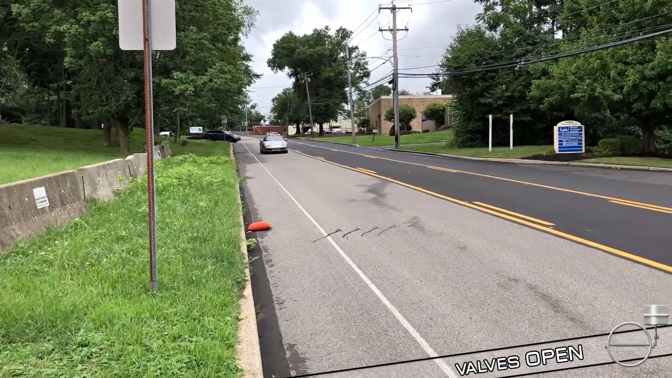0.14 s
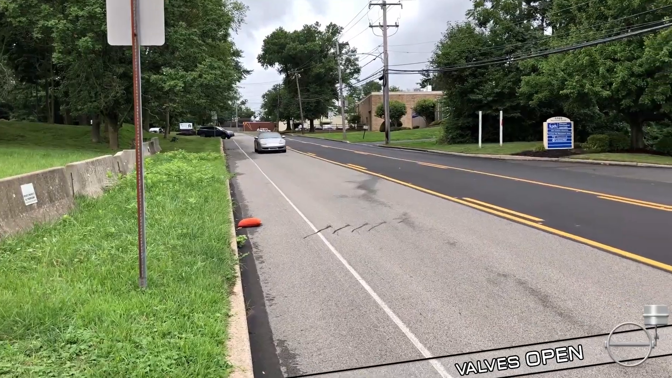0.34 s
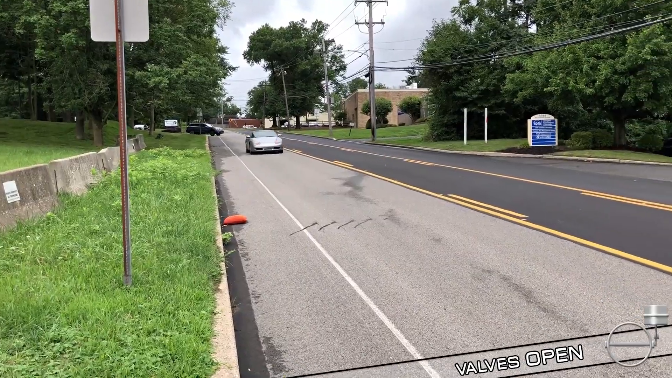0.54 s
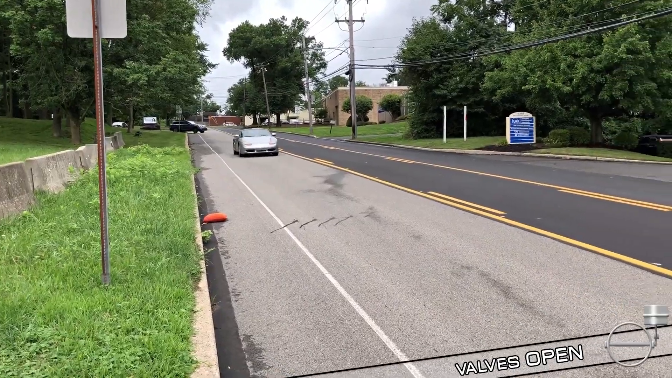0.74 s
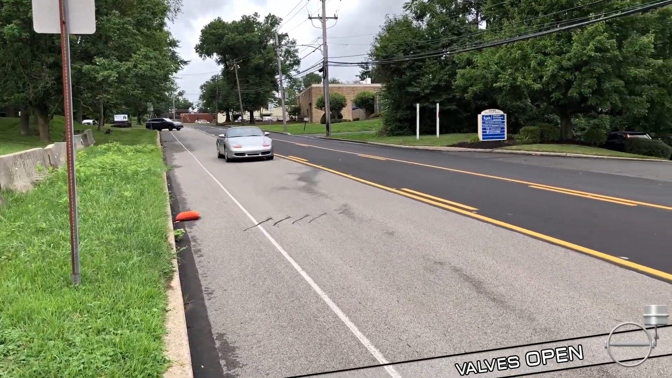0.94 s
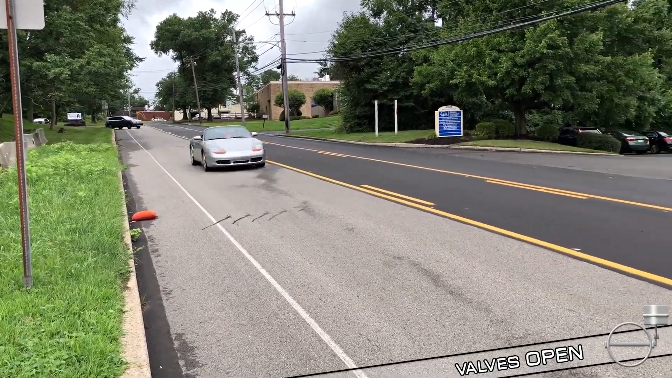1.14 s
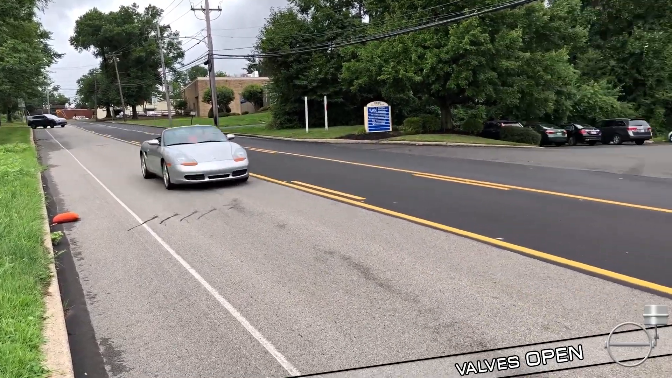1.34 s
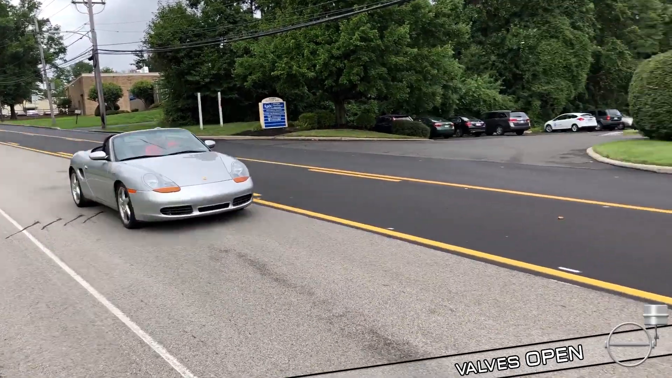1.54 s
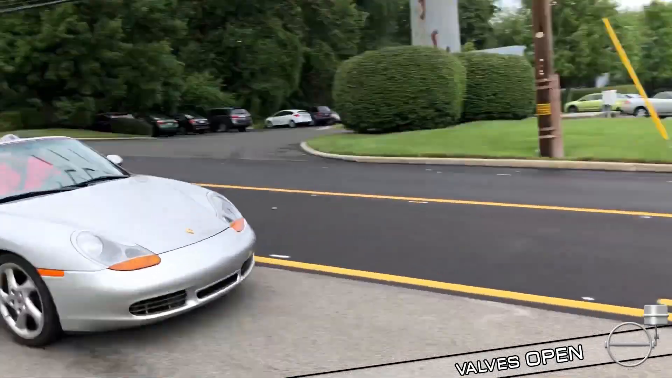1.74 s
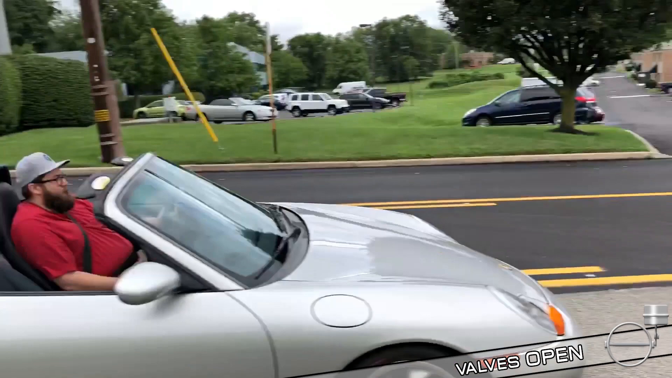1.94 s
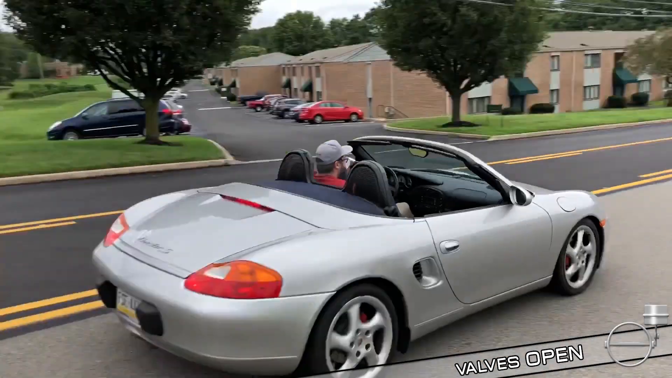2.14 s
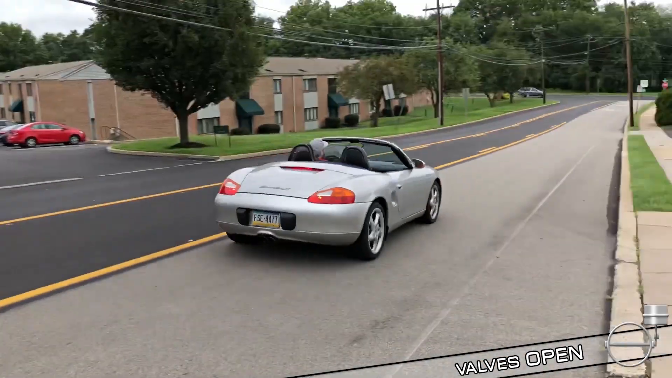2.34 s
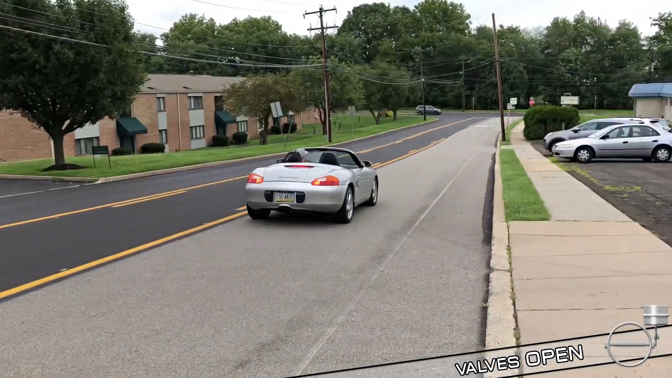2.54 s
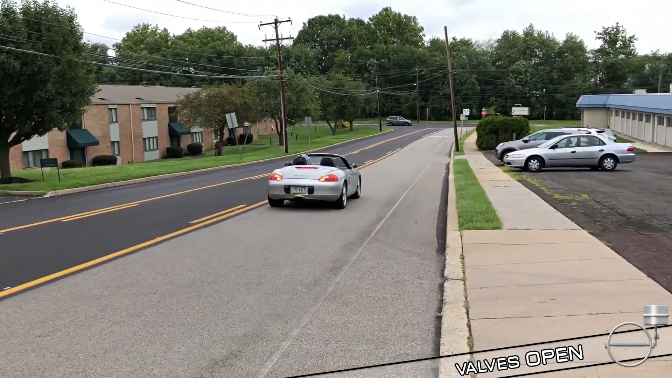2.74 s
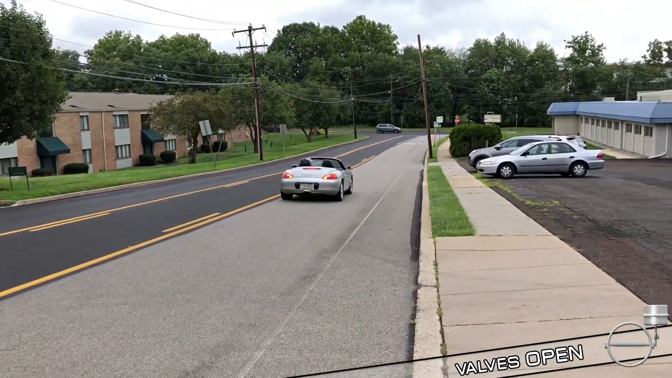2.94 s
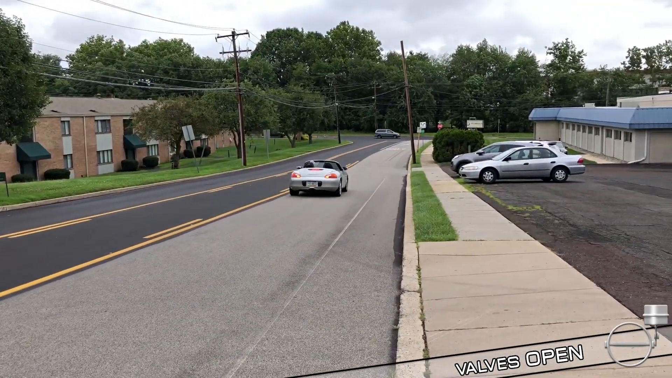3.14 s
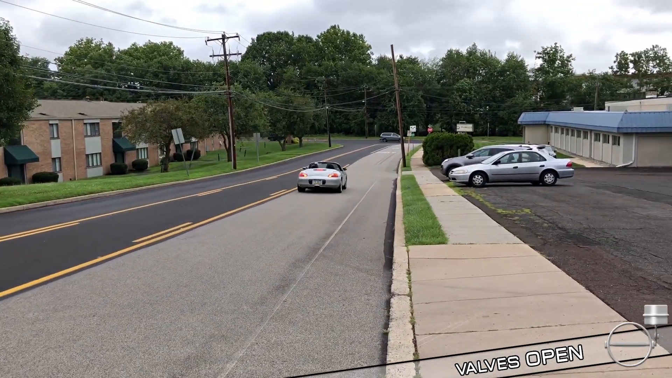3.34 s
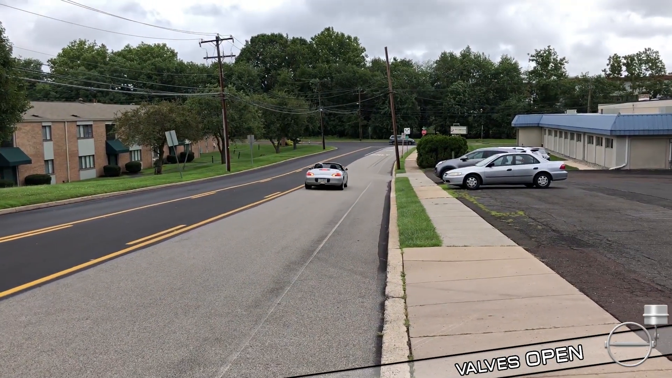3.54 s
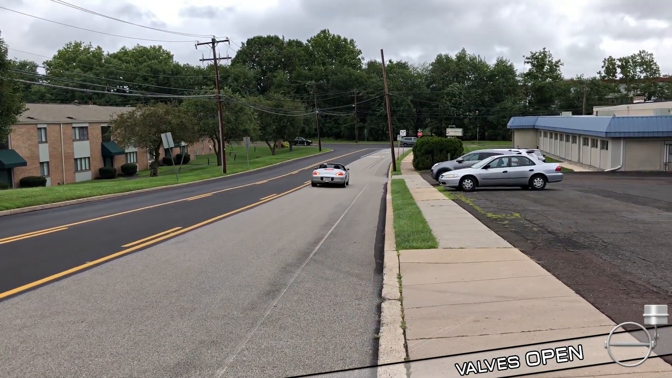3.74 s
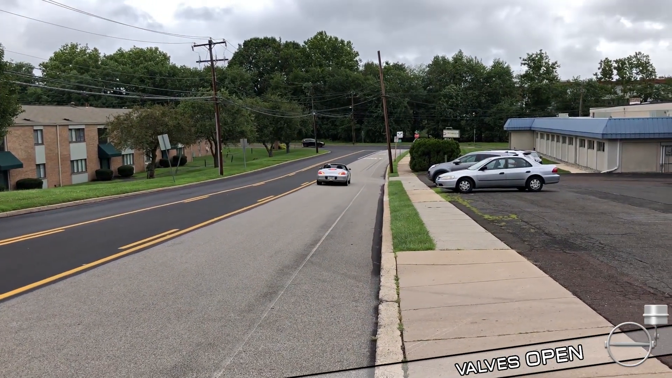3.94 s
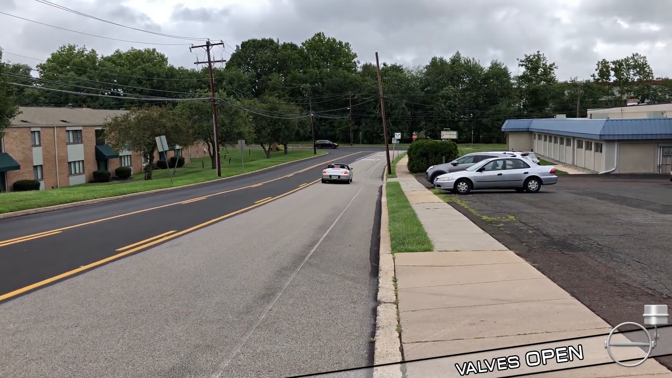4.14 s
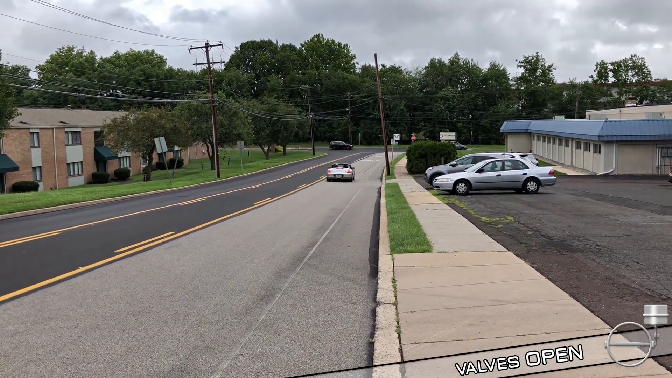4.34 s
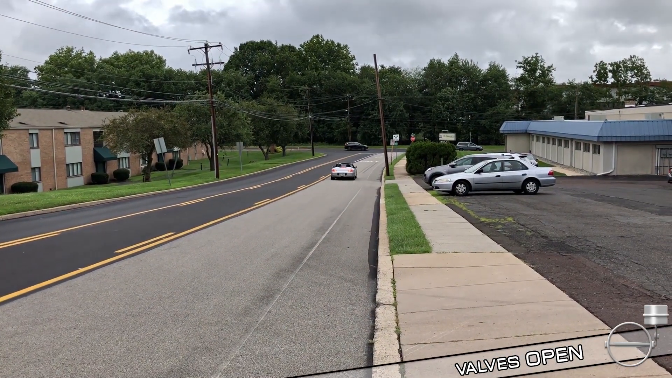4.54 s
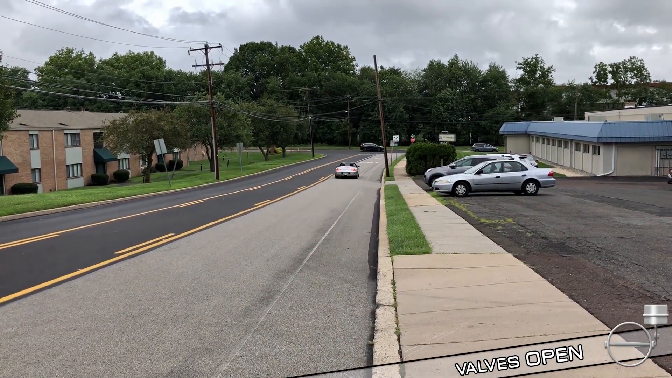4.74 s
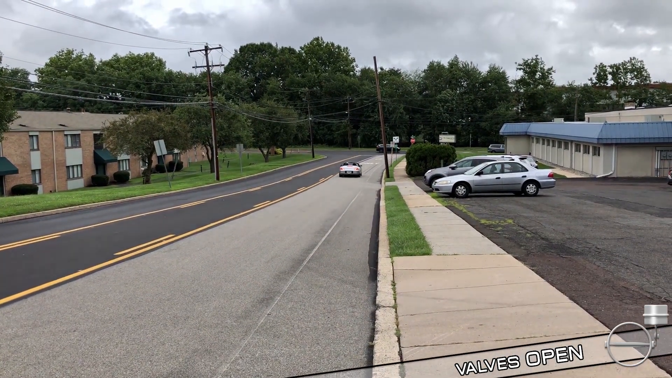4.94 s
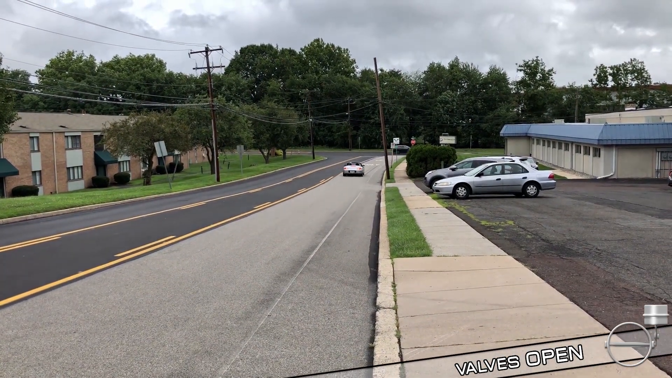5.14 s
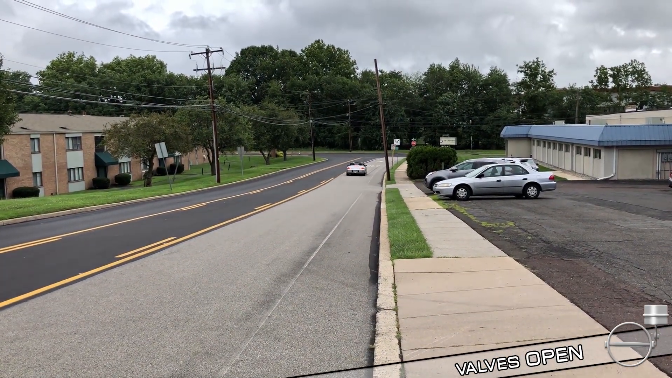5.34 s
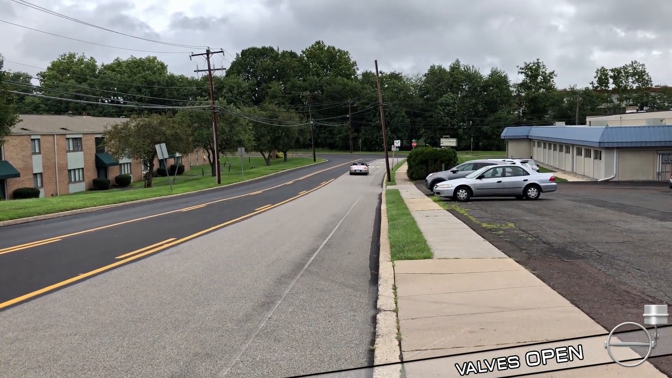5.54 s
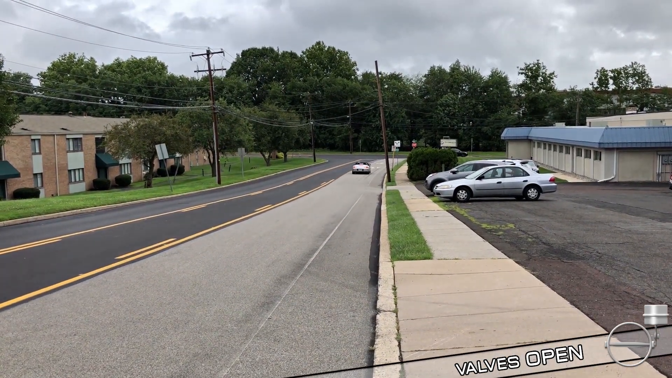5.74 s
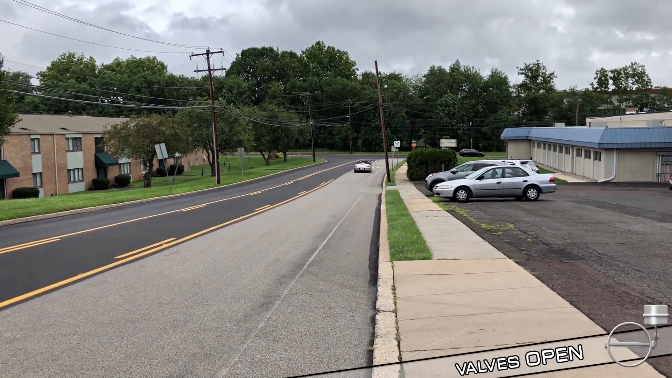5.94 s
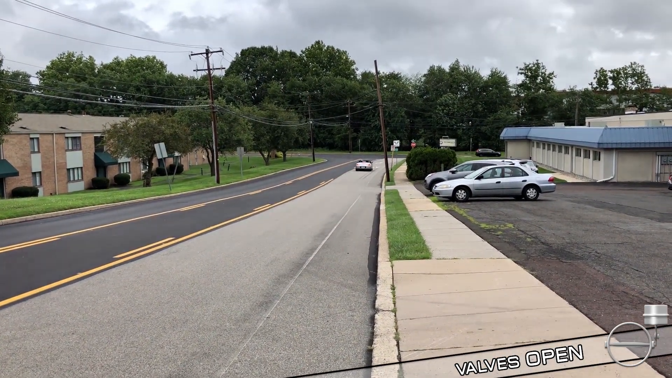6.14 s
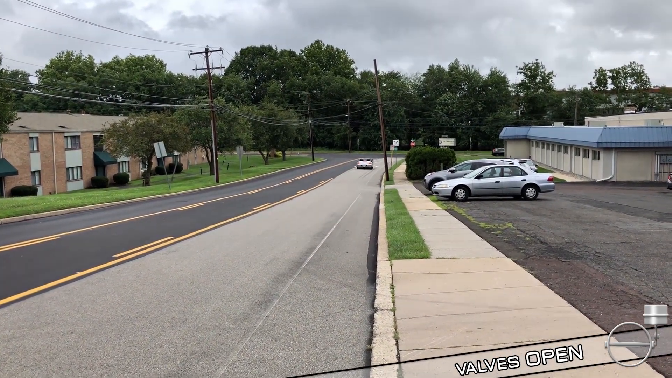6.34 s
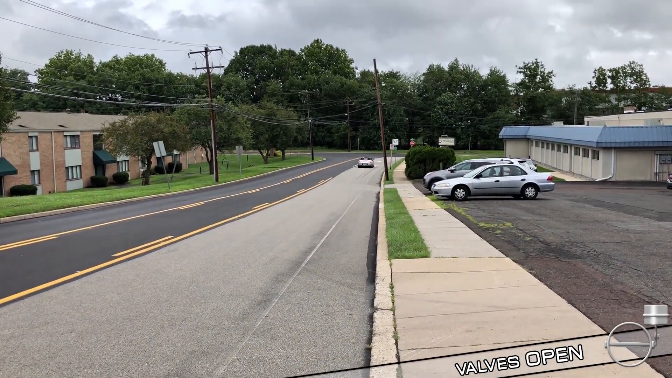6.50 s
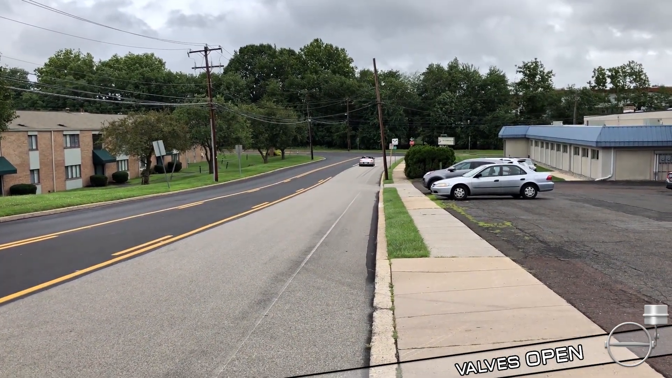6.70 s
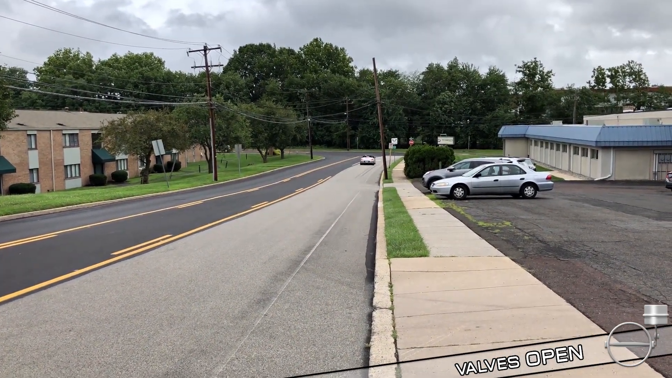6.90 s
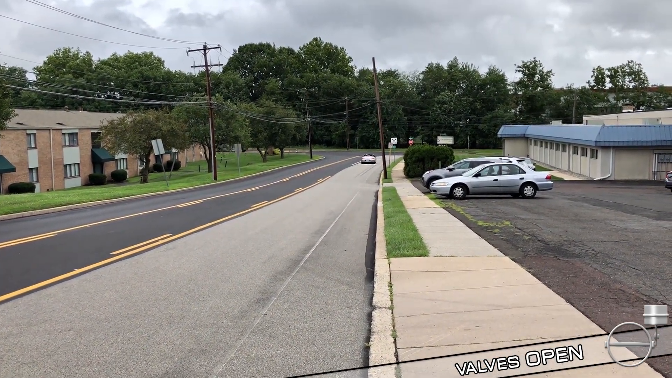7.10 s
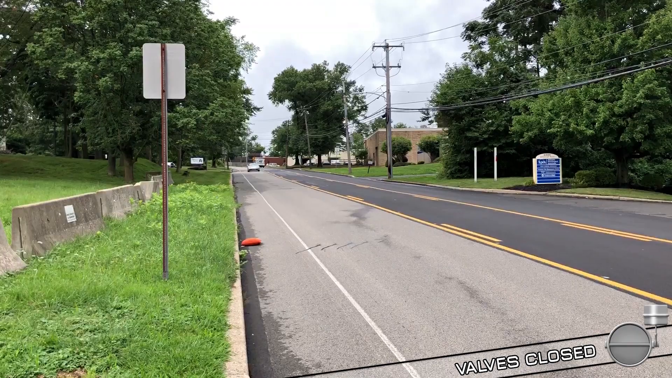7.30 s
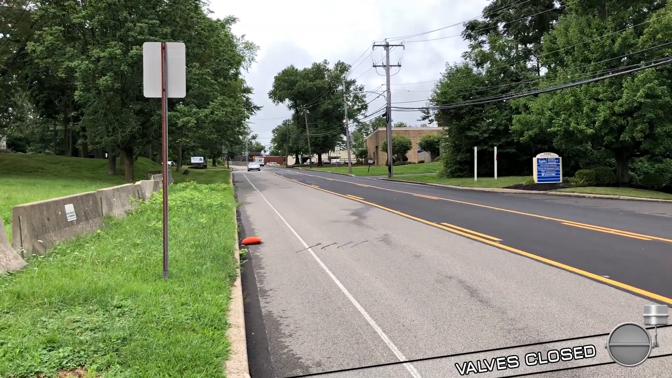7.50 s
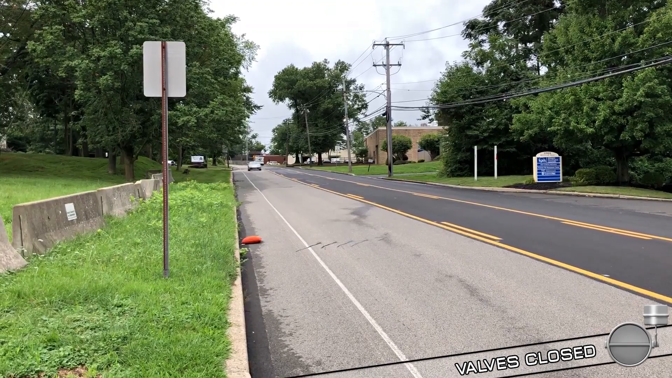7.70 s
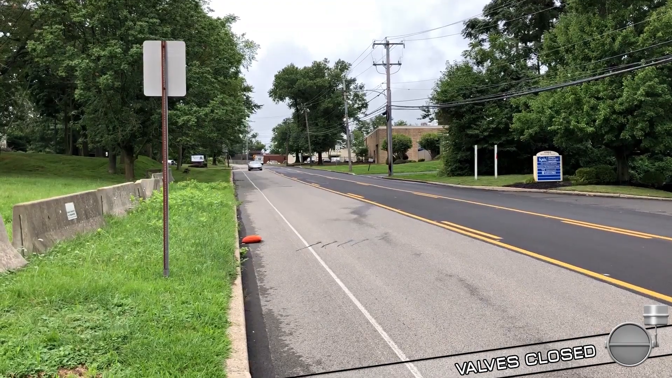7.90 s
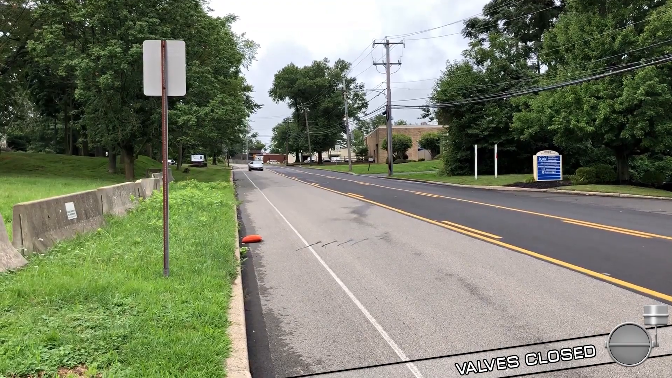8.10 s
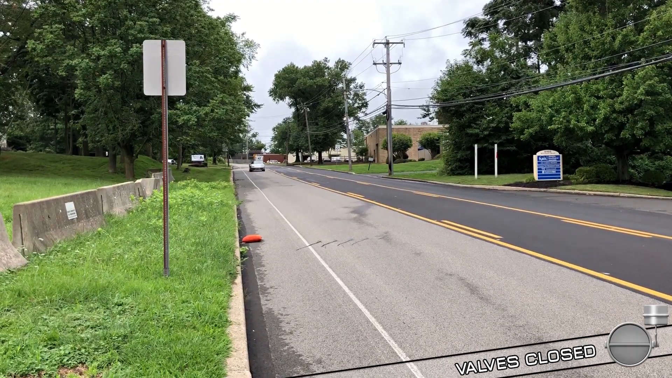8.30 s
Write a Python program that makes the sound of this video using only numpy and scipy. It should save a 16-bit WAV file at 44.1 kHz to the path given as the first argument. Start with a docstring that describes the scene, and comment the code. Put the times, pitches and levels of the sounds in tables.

```python
"""A sports car passing

A flat-six car comes up a tree-lined road, passes close by and pulls away, with one hard stab of throttle. Its
firings make exhaust harmonics and rasp; its tyre noise changes colour with the angle of view. Wind bumps the
microphone and the brakes sing thinly on the approach. Then the car approaches again from far off, quietly, with
one sharp exhaust crack, while two insects chirp in the verge."""
import sys
import numpy as np
from scipy import signal
from scipy.fft import rfft, irfft, next_fast_len
from scipy.io import wavfile
from scipy.ndimage import uniform_filter1d, map_coordinates

SR = 44100
rng = np.random.default_rng(int(sys.argv[2]) if len(sys.argv) > 2 else 0)


def transcribe(signal):
    """Save signal, clipped to [-1, 1], as a 16-bit WAV file at the path in sys.argv[1]."""
    frames = np.atleast_2d(signal).T
    limited = np.clip(frames, -1, 1)
    pcm = np.round(limited * 32767).astype(np.int16)
    wavfile.write(sys.argv[1], SR, pcm)


N = 373086
TIME = np.arange(N) / SR

# firing rate of one cylinder bank, Doppler shift included: t/s, f/Hz
BANK_RATE = [(0, 109.5), (1.1, 108.1), (1.7, 99), (1.88, 93.14), (2.06, 96.5), (2.3, 76), (2.42, 73.94),
             (2.9, 103.6), (3.15, 100.4), (4.5, 94.08), (5.0, 90.4), (5.18, 86.8), (5.36, 100.1),
             (5.5, 101.1), (5.65, 88.6), (5.9, 79.5), (6.3, 90.05), (6.88, 113.1), (7.1, 106.8), (7.6, 100),
             (8.0, 98.9), (8.46, 109.8)]
# presses of the throttle: start t/s, rise t/s, end t/s, depth (0-1)
THROTTLE_PRESSES = [(0.05, 0.32, 0.83, .615), (2.56, 0.23, 4.95, .605), (5.08, .24, 5.405, 1),
                    (5.41, 0.0384, 5.55, 0.68), (6.2, .3, 7.37, .62)]
# boom at the firing rate of one bank: t/s, level/dB
BOOM_LEVEL = [(0.35, -47.5), (0.94, -39.5), (1.02, -48), (1.09, -30), (1.43, -26.5), (1.52, -38),
              (1.75, -19.5), (1.91, -19.5), (1.95, -31), (2.09, -9.5), (2.45, -27.5), (3.22, -30.5),
              (3.26, -46), (3.31, -34.5), (3.47, -24), (3.58, -41), (3.71, -44), (3.74, -32.5),
              (4.91, -37.5), (5.09, -43.5), (5.82, -41), (5.88, -47), (6.2, -36), (6.43, -44.5),
              (6.92, -32), (7.01, -40), (7.06, -31.5), (7.76, -58), (8.41, -47.5), (8.46, -54)]
# lines of the exhaust drone: multiple of the four-stroke cycle, relative level/dB
DRONE_ORDERS = [(2, -10), (7, -3.5), (8, -3.5), (9, -18), (10, -10), (12, 1), (13, -14), (16, 1), (17, -18),
                (30, -3.5), (33, -2.5), (39, -3.5)]
# response of the exhaust pipe: f/Hz, relative level/dB
PIPE_RESPONSE = [(60, -45), (200, -12), (300, -10), (400, -10), (590, -0.5), (720, -15), (900, -3),
                 (1200, 0.5), (1480, -14), (1750, -6.5), (2200, -2), (2750, -13.5), (3150, -13.5),
                 (4400, -27.5), (7500, -26), (15600, -50)]
# reverberation time of the street: f/Hz, t/s
STREET_T60 = [(100, 1), (1000, 0.22), (4000, 0.12), (12000, 0.047)]
# tyre spectra from five views: f/Hz, relative level/dB
TYRE_FRONT = [(180, -14.5), (300, -8), (326, -21), (348, -8.5), (526, -3), (708, -11), (836, -4),
              (970, -1.5), (1370, -7.5), (1760, -3), (3760, -24), (4500, -25), (5970, -26.5), (10500, -38),
              (12600, -37.5), (15600, -50)]
TYRE_SIDE = [(250, -6), (340, -3.5), (420, -11.5), (560, -1.5), (720, -1.5), (1000, -5), (1300, -3),
             (2000, -7.5), (3400, -17.5), (4600, -27), (6300, -26.5), (8400, -37), (13600, -34),
             (15600, -34)]
TYRE_REAR = [(300, -10), (600, -1), (900, 3.5), (1350, -6), (1650, -3.5), (2200, -10.5), (2550, -14.5),
             (3100, -17.5), (3700, -19.5), (5000, -18.5), (7200, -27), (9000, -27.5), (13000, -30.5),
             (15600, -38)]
TYRE_FAR_LEAVING = [(180, -36), (300, -27), (354, -8), (384, -7), (469, 1.5), (581, -1), (732, -7),
                    (923, -4), (1200, -11), (1280, -6), (2140, -6.5), (3580, -25), (5230, -29), (9020, -41),
                    (15600, -50)]  # mixed with engine rush
TYRE_FAR_COMING = [(300, -7.5), (750, -8), (900, -4), (1100, -2.5), (1380, -7.5), (1960, -4), (2620, -17.5),
                   (3570, -13), (4930, -21.5), (8000, -29.5), (11000, -34.5), (15600, -42)]
# view of the car: t/s, view (0-4, in the order above)
VIEW = [(1.6, 0), (1.95, 1), (2.25, 1), (2.75, 2), (4.9, 2), (6.4, 3), (7.25, 3), (7.45, 4)]
# tyre noise at the least distance, a row per view: body roar level/dB, tread level/dB, hiss level/dB
TYRE_LEVELS = [(-25, -20.6, -34), (-22, -20, -31), (-23, -20, -28), (-18.5, -24, -23), (-29, -30.5, -34.5)]
# notches in the rear view: f/Hz, width/Hz, relative level/dB
REAR_NOTCHES = [(787, 92, -10), (2700, 130, -4), (4300, 770, -2.5), (10555, 830, -7)]
# tailpipe resonances heard from behind: f/Hz, width/Hz, relative level/dB
PIPE_RESONANCES = [(1910, 45, 2), (2140, 69, 3), (4600, 85, 1), (5780, 55, -3)]
# spectra of the car's rumble and of wind on the microphone: f/Hz, relative level/dB
RUMBLE_SPECTRUM = [(20, -47), (45, -18), (62, 1.5), (80, 2.5), (110, 1), (170, -1.5), (270, -2.5),
                   (400, -20.5), (700, -65)]
BUFFET_SPECTRUM = [(8.8, -26), (15, 2), (91, 0.5), (171, -7.5), (209, 2.5), (277, -13.5), (311, -11),
                   (358, -33), (450, -22), (580, -54), (990, -120)]
# a gust, then the car's bow wave: start t/s, end t/s, level/dB
GUSTS = [(0, 0.222, -21.5), (2.064, 2.078, -33)]
# song of the brake pads: t/s, f/Hz, relative level/dB
BRAKE_SONG = [(1.1, 13800, -60), (1.116, 13700, -48), (1.232, 13400, -48), (1.384, 13700, -36.5),
              (1.784, 13600, -30), (1.88, 13380, -44)]
# chirps of two insects, a lower and a higher: t/s, relative level/dB, f/Hz
CHIRPS = [(7.1835, -60, 9160), (7.2908, -65, 9430), (7.4586, -63, 9480), (7.5056, -59, 9070),
          (7.652, -67, 9490), (7.7147, -59, 9100), (7.8314, -65.5, 9570), (7.914, -57, 9120),
          (8.0266, -64, 9500), (8.1607, -57.5, 9100), (8.239, -62.5, 9600), (8.3958, -59, 9200)]

SPEED_M_PER_S, LEAST_DISTANCE_M = 13.25, 3.165
PASS_AT, RETURN_AT = 2.03, 10.43  # t/s: the car draws level, and would again on its second approach
RETURN_FROM, RETURN_FADE_S, VALVES_DB = 7.25, 0.24, -4  # second approach, with the exhaust valves closed
ABEAM_AT, ABEAM_S = 1.985, 0.067  # flank and side intake face the microphone: t/s, half width/s
WAKE_AT, WAKE_S = 2.41, 0.54  # the turbulent wake lies in the sound path: t/s, half width/s


def amp(db):
    """Decibels to amplitude ratio."""
    return 10 ** (np.asarray(db) / 20)


def unit(x):
    """x at rms 1."""
    return x / np.sqrt(np.mean(x ** 2) + 1e-20)


def along(points, hz):
    """(f/Hz, value) points interpolated on a log frequency axis."""
    f, v = np.transpose(points)
    return np.interp(np.log(hz + 1), np.log(f + 1), v)


def curves(rows):
    """One value per sample for each column after the time."""
    times, *columns = np.transpose(rows)
    return [np.interp(TIME, times, column) for column in columns]


def bump(at, half_width):
    """A Gaussian of height 1 in time."""
    return np.exp(-((TIME - at) / half_width) ** 2)


def wobble(rate):
    """A smooth random curve, rate knots a second."""
    return map_coordinates(rng.standard_normal(int(N * rate / SR) + 4), [TIME * rate])


def harmonic(angle, order):
    """A sine of rms 1 locked to the four-stroke cycle."""
    return np.sqrt(2) * np.sin(order * angle)


def filtered(x, response):
    """Linear filtering: the spectrum of x times a frequency response."""
    size = next_fast_len(N + 8192)
    return irfft(rfft(x, size) * response(np.fft.rfftfreq(size, 1 / SR)), size)[:N]


def shaped(x, bells):
    """x with Gaussian peaks or notches (f/Hz, width/Hz, level/dB)."""
    return filtered(x, lambda hz: amp(sum(db * np.exp(-((hz - centre) / width) ** 2)
                                          for centre, width, db in bells)))


def coloured(x, spectrum):
    """x filtered by a (f/Hz, level/dB) curve, at rms 1."""
    return unit(filtered(x, lambda hz: amp(along(spectrum, hz))))


def noise(spectrum):
    """Coloured Gaussian noise of rms 1."""
    return coloured(rng.standard_normal(N), spectrum)


def street(x, wet_db):
    """Reverberation: trees and house fronts add a diffuse tail whose treble dies first."""
    hz, t, spectra = signal.stft(rng.standard_normal(SR // 2), SR, nperseg=256)
    decay = amp(-60 * t / along(STREET_T60, hz)[:, None])
    tail = signal.istft(spectra * decay, SR, nperseg=256)[1]
    return x + amp(wet_db) * signal.fftconvolve(x, tail / np.linalg.norm(tail))[:N]


def drive(lift_s=0.105, ease_per_s=0.125):
    """The car's state: straight-line motion sets spherical spreading and aspect; the pedal sets load."""
    again = np.clip((TIME - RETURN_FROM) / RETURN_FADE_S, 0, 1)
    blend = lambda pair: (1 - again) * pair[0] + again * pair[1]
    to_go = SPEED_M_PER_S * (np.array([[PASS_AT], [RETURN_AT]]) - TIME)
    distance = np.hypot(to_go, LEAST_DISTANCE_M)
    throttle = np.zeros(N)
    for start, rise, end, depth in THROTTLE_PRESSES:
        pressed = np.clip(np.minimum((TIME - start) / rise, 1 - (TIME - end) / lift_s), 0, 1)
        throttle = np.maximum(throttle, depth * np.exp(-ease_per_s * (TIME - start)) * pressed)
    return dict(spread_db=blend(20 * np.log10(LEAST_DISTANCE_M / distance)),
                ahead=blend((1 + to_go / distance) / 2),  # 1 nose on, 0 tail on
                again=again, throttle=throttle, bank_hz=curves(BANK_RATE)[0])


def heard(car, db, falloff, ahead_db, throttle_db, bend):
    """Engine level/dB from spreading loss, directivity, the valves and a power law of the throttle."""
    return (db + falloff * car["spread_db"] + ahead_db * car["ahead"] + VALVES_DB * car["again"]
            + throttle_db * car["throttle"] ** bend)


def revving(car, cruise_hz=96):
    """Firing rate above cruising, weighted by rearward directivity."""
    return (car["bank_hz"] - cruise_hz) * (1 - car["ahead"])


def exhaust_notes(car, cycles, shake_db=4.0, shake_rad=0.065, intake_db=-12, intake_third_db=-27,
                  wake_db=8.5, overrev_db_per_hz=-0.72):
    """Harmonic series: each bank fires three times a cycle; unequal cylinders add the lines between."""
    angle = 2 * np.pi * cycles
    wake, abeam = bump(WAKE_AT, WAKE_S), bump(ABEAM_AT, ABEAM_S)
    shaken = lambda: angle + shake_rad * (0.34 + wake) * wobble(45)  # phase jitter, most in the wake
    throb_db = heard(car, db=-36, falloff=0.79, ahead_db=-3.5, throttle_db=16, bend=1.06)
    full_db = heard(car, db=-37.5, falloff=1.066, ahead_db=0, throttle_db=41.5, bend=1.14)
    third_db = heard(car, db=-27, falloff=1.88, ahead_db=-6.5, throttle_db=39, bend=4) + wake_db * wake
    bark_db = heard(car, db=-36, falloff=1.0, ahead_db=-9, throttle_db=27.5, bend=2.3)
    drone_db = heard(car, db=-43, falloff=0.56, ahead_db=-10.5, throttle_db=13.5, bend=3.6)
    drone_db += overrev_db_per_hz * np.maximum(revving(car), 0)  # thins out at high revs
    notes = amp(curves(BOOM_LEVEL)[0] + 0.6 * wobble(14)) * harmonic(angle, order=3)  # one bank
    notes += amp(throb_db + 1.6 * wobble(12)) * harmonic(angle, order=4)  # twice a crank turn
    full_gain = amp(full_db + 1.05 * wobble(13)) + amp(intake_db) * abeam
    notes += full_gain * harmonic(angle, order=6)  # all six cylinders
    third_gain = amp(third_db + shake_db * wake * wobble(49)) + amp(intake_third_db) * abeam
    notes += third_gain * harmonic(shaken(), order=9)  # third harmonic of one bank
    notes += amp(bark_db + 2.0 * wobble(10)) * harmonic(angle + 0.012 * wobble(25), order=18)
    for multiple, db in DRONE_ORDERS:
        notes += amp(drone_db + db + 4.0 * wobble(7)) * harmonic(shaken(), order=round(multiple))
    return notes


def exhaust_rasp(car, cycles, revs_db_per_hz=0.37, decay=0.36, far_bank=0.53, scatter_db=1,
                 gas_share=0.95):
    """Pulse excitation: each firing sends a pressure step and a burst of gas noise down the pipe."""
    firings = 6 * cycles
    firing = firings.astype(int)
    number = np.arange(firing[-1] + 1)
    bank_gain = np.where(number % 2, far_bank, 1)
    strength = (amp(scatter_db * rng.standard_normal(len(number))) * bank_gain)[firing]
    steps = strength * np.diff(firing, prepend=0)
    gas = strength * np.exp(-(firings % 1) / (2 * decay)) * rng.standard_normal(N)
    # the silencer smears each step over a few milliseconds
    t = np.arange(SR // 100) / SR
    smear = np.sin(2 * np.pi * (400 * t + 9e5 * t * t)) * (t < .008) * np.exp(-t / .004)
    steps = signal.fftconvolve(steps, smear)[:N]
    bursts = np.sqrt(1 - gas_share) * coloured(steps, PIPE_RESPONSE)
    bursts += np.sqrt(gas_share) * coloured(gas, PIPE_RESPONSE)
    rasp_db = heard(car, db=-28.5, falloff=1.08, ahead_db=-15, throttle_db=28.5, bend=4.2)
    rasp_db += revs_db_per_hz * revving(car)
    return street(bursts * amp(rasp_db), wet_db=-12)


def engine(car):
    """Phase locking: notes and rasp follow the same slightly unsteady four-stroke cycle."""
    bank_hz = car["bank_hz"] * (1 + 0.0031 * wobble(20))
    cycles = np.cumsum(bank_hz) / (3 * SR)
    return exhaust_notes(car, cycles) + exhaust_rasp(car, cycles)


def tyre_bands(source, gains, low_hz=770, high_hz=3000):
    """Crossover filtering: body roar, tread noise and hiss, each at its own level."""
    above = lambda hz, edge: 1 / (1 + (edge / (hz + 1)) ** 8)
    bands = [lambda hz: 1 - above(hz, low_hz),
             lambda hz: above(hz, low_hz) - above(hz, high_hz),
             lambda hz: above(hz, high_hz)]
    return sum(gain * unit(filtered(source, band)) for gain, band in zip(gains, bands))


def tyres(car, body_falloff=1.208, tread_falloff=0.81, hiss_falloff=1.306, abeam_db=-3,
          rush_db_per_hz=0.09):
    """Directivity: tyre noise changes colour as the car shows its front, side and rear."""
    rush_db = rush_db_per_hz * revving(car)  # revs add engine rush
    body_db = body_falloff * car["spread_db"] + 0.58 * wobble(12)
    tread_db = tread_falloff * car["spread_db"] + abeam_db * bump(ABEAM_AT, ABEAM_S) + 1.1 * wobble(15)
    hiss_db = hiss_falloff * car["spread_db"] + 0.21 * wobble(10)
    gains = amp([body_db, tread_db, hiss_db]) * amp(rush_db)
    rear = shaped(noise(TYRE_REAR), list(REAR_NOTCHES) + list(PIPE_RESONANCES))
    sources = [noise(TYRE_FRONT), noise(TYRE_SIDE), rear,
               shaped(noise(TYRE_FAR_LEAVING), PIPE_RESONANCES), noise(TYRE_FAR_COMING)]
    view = curves(VIEW)[0]
    rolling = np.zeros(N)
    for k, source in enumerate(sources):
        weight = np.sqrt(np.maximum(1 - np.abs(view - k), 0))  # equal-power crossfade
        rolling += weight * tyre_bands(source, gains * amp(TYRE_LEVELS[k])[:, None])
    return rolling


def shimmer(x, base_db=1.0, treble_db=1.3, surge_db=0.8):
    """Multipath fading: shifting sound paths lift and sink narrow bands, and the hiss surges."""
    hz, _, spectra = signal.stft(x, SR, nperseg=1024)
    fading = rng.standard_normal(spectra.shape)
    for _ in range(2):
        fading = uniform_filter1d(uniform_filter1d(fading, size=5, axis=0), size=22, axis=1)
    depth_db = along([(500, base_db), (2000, base_db), (5000, treble_db), (11000, base_db)], hz)[:, None]
    surge = unit(uniform_filter1d(rng.standard_normal(spectra.shape[1]), size=9)) * (hz > 2400)[:, None]
    gain = amp(depth_db * unit(fading) + surge_db * surge)
    return signal.istft(spectra * gain, SR, nperseg=1024)[1][:N]


def rumble(car, swirl_db=-21, swirl_s=0.12):
    """Low-frequency noise: the car's rumble, swelled by the swirl of air as it passes."""
    rumble_db = heard(car, db=-31.5, falloff=0.57, ahead_db=-1.5, throttle_db=4.5, bend=4.0)
    return (amp(rumble_db) + amp(swirl_db) * bump(PASS_AT, swirl_s)) * noise(RUMBLE_SPECTRUM)


def wind_buffet(rise_db_per_s=300, fall_db_per_s=125):
    """Turbulent pressure: a gust and the car's bow wave strike the microphone."""
    gusts = sum(amp(db - rise_db_per_s * np.maximum(start - TIME, 0)
                    - fall_db_per_s * np.maximum(TIME - end, 0)) for start, end, db in GUSTS)
    return gusts * amp(1.5 * wobble(25.8)) * noise(BUFFET_SPECTRUM)


def narrowband(centre_hz, width_hz):
    """Random modulation spreads a carrier into a band of noise, at rms 1."""
    envelope = wobble(width_hz) + 1j * wobble(width_hz)
    return unit((envelope * np.exp(2j * np.pi * np.cumsum(centre_hz) / SR)).real)


def brakes(skirt_db=-3, scrape_db=-9, below_hz=170, chatter_db=3, fade_s=0.015):
    """Friction-induced vibration: the pads sing a fuzzy, very high line over a chattering scrape."""
    hz, db = curves(BRAKE_SONG)
    start, end = BRAKE_SONG[0][0], BRAKE_SONG[-1][0]
    contact = np.interp(TIME, [start - fade_s, start + fade_s, end - fade_s, end + fade_s], [0, 1, 1, 0])
    song = narrowband(hz, width_hz=420)
    song += amp(skirt_db) * narrowband(hz - below_hz, width_hz=1400)
    song += amp(scrape_db) * narrowband(hz - below_hz, width_hz=3400)
    return contact * amp(db - 2.5) * unit(song * amp(chatter_db * wobble(500)))


def insects(chirp_s=0.055, width_hz=420):
    """Stridulation: two insects scrape their wings in short chirps, one lower and one higher, softened by
    echoes."""
    chirps = np.zeros(N + SR)
    t = np.arange(int(chirp_s * SR)) / SR
    swell = np.abs(np.sin(np.pi * t / chirp_s)) ** 0.5
    for start, db, hz in CHIRPS:
        grain = map_coordinates(rng.standard_normal(64), [t * width_hz])
        scrape = (1 + 0.5 * grain) * np.sin(2 * np.pi * hz * t + 1.26 * grain[::-1])
        chirps[round(start * SR):][:len(t)] += amp(db - 3) * swell * scrape
    return street(chirps[:N], wet_db=-2)


def exhaust_crack(at=7.5742, gain_db=-26, pipe_hz=1650, ring_t60=0.0046, thud_hz=260, thud_db=-11):
    """Damped resonance: one pop rings the tailpipe for a few cycles over a low thud."""
    t = np.maximum(TIME - at, 0)
    ring = amp(-60 * t / ring_t60) * (1 - np.exp(-t / 0.00059)) * np.sin(2 * np.pi * pipe_hz * t)
    thud = amp(thud_db - 60 * t / 0.031) * np.sin(2 * np.pi * thud_hz * t)
    return street(amp(gain_db) * (ring / np.abs(ring).max() + thud), wet_db=-13)


def scene():
    """Superposition: all sources add at the roadside, in one channel."""
    car = drive()
    return (engine(car) + shimmer(tyres(car)) + rumble(car) + wind_buffet()
            + brakes() + insects() + exhaust_crack())[None]


def record(dry, ceiling=0.61, cutoff_hz=15720):
    """Soft saturation rounds the loudest peaks; a band limit removes the highest treble."""
    x = dry[0]
    rounded = x / (1 + np.abs(x / ceiling) ** 8) ** (1 / 8)
    return filtered(rounded, lambda hz: hz < cutoff_hz)[None]


dry = scene()
out = record(dry)
transcribe(out)
```